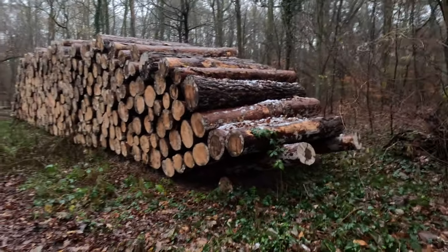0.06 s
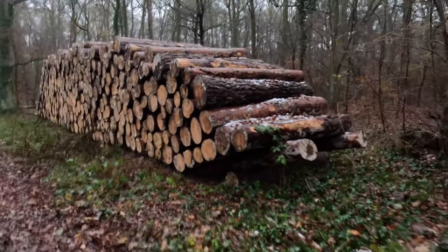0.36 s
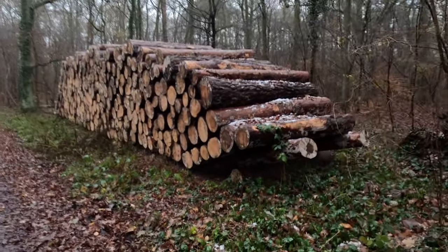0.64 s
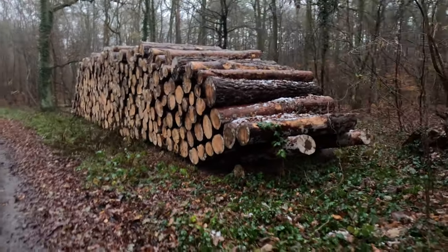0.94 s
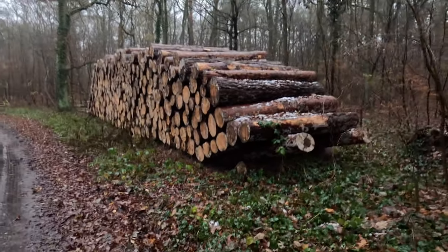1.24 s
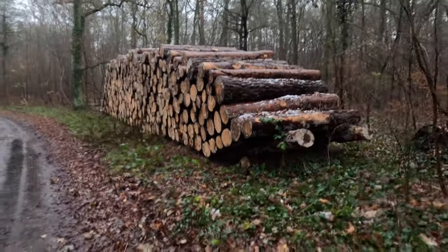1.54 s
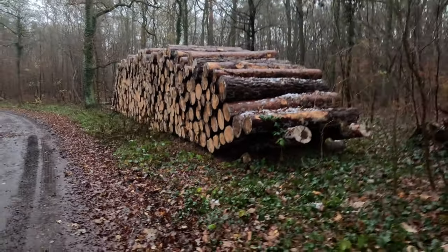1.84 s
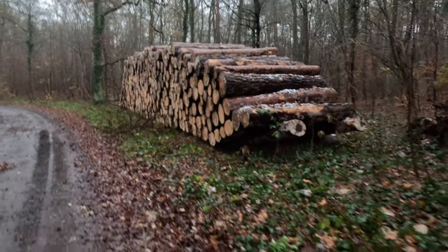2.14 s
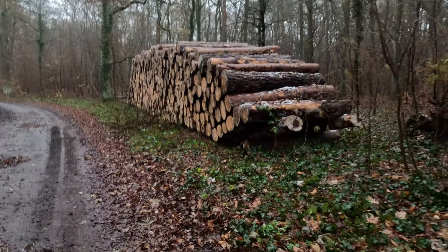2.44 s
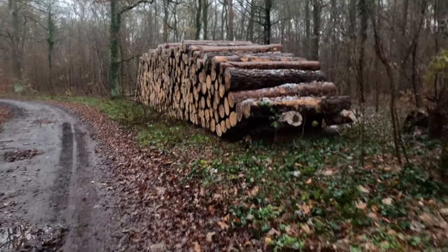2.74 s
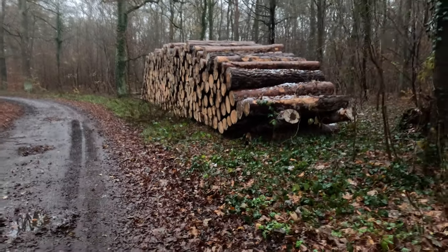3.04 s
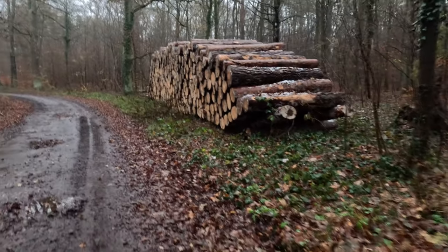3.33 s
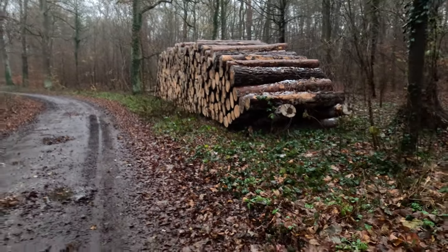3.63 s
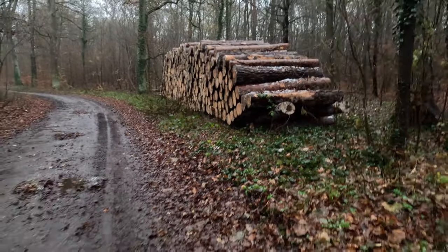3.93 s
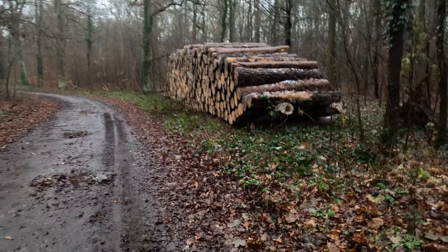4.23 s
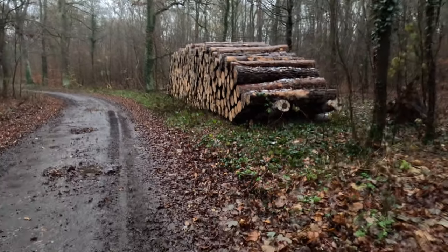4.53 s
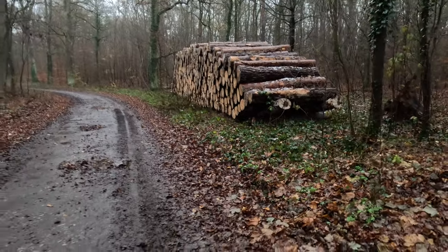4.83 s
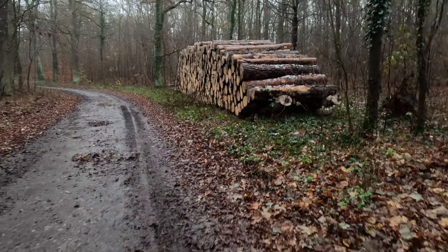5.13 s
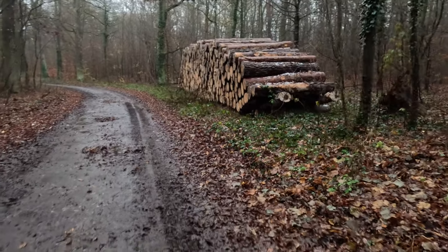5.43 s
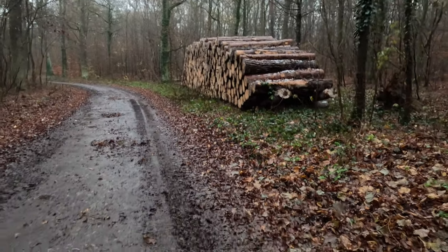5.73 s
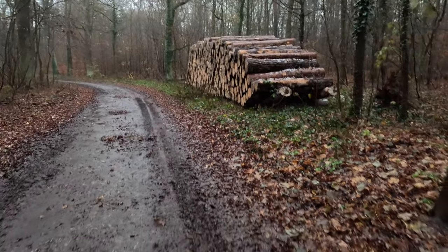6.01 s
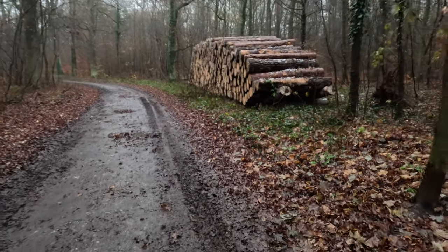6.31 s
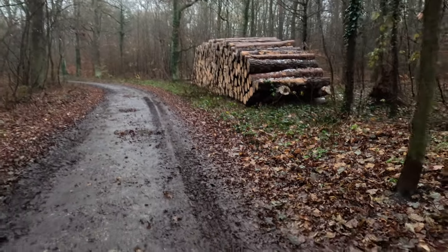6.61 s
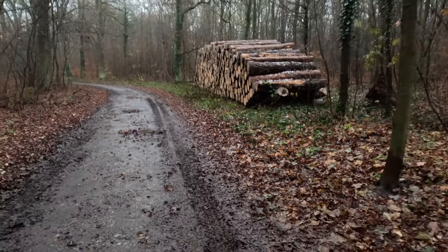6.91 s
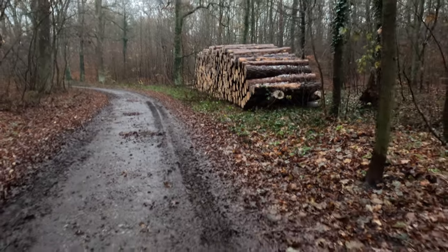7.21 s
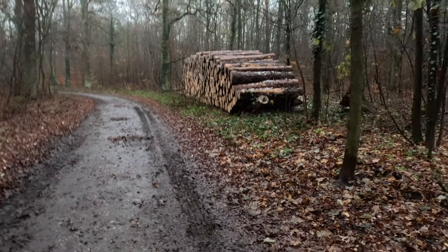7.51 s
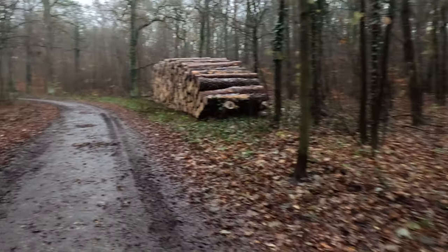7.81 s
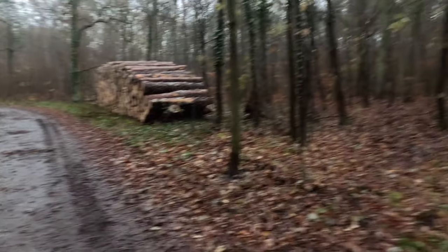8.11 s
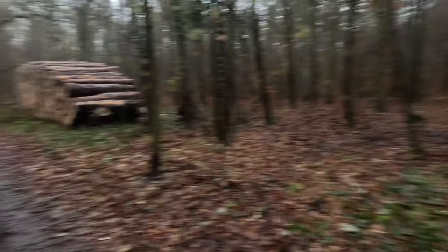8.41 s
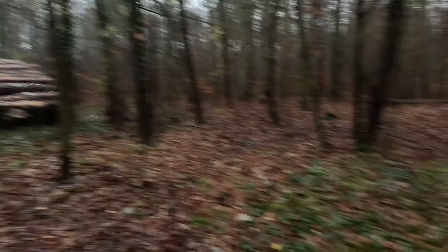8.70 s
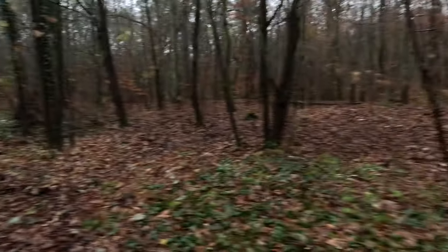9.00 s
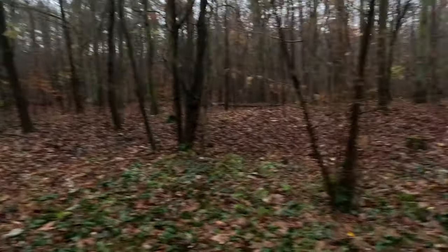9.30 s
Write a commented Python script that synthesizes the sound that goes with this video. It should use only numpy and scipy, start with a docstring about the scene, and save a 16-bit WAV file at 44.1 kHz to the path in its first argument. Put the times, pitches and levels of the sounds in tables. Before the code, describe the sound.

Slow footsteps on a muddy forest track are heard close to a hand-held microphone, over a soft woodland hush and a light, low breeze rumble. From about 0.3 seconds the steps come a little more than half a second apart. Heels sink in with dull thuds, mud squelches in small bubbly pops, and wet leaves crackle under the soles, while twigs and grit snap irregularly throughout. The heaviest thuds land at about 5.5 and 6.6 seconds. Small birds give faint, thin, high whistles far off, echoing among the trees, near the start, around 2 seconds, from 3 to 5, and again from 7 to just past 8. A brief gust bumps the microphone near 4.9 seconds. From about 8.5 seconds, stronger air rumbles and thumps on the microphone, leaning to the right, as the steps carry on until about 9.5 seconds.

```python
"""Slow footsteps thud and squelch along a muddy forest track, heard by a hand-held microphone.
Each heel sinks into soft ground, mud bubbles and wet leaves crackle under the sole, and small
twigs and grit snap. Little birds whistle far off over the hush of the wood. Moving air rumbles
on the microphone, most near the end as the walker turns."""
import sys
import numpy as np
from scipy import signal
from scipy.io import wavfile
from scipy.ndimage import uniform_filter1d

SR = 44100
rng = np.random.default_rng(int(sys.argv[2]) if len(sys.argv) > 2 else 0)


def to_wav(sig):
    """Store sig (one row per channel, or 1-D mono) as 16-bit WAV at the path in sys.argv[1].

    Samples outside -1..1 are clipped; the rate is SR.
    """
    pcm = np.clip(np.atleast_2d(sig), -1, 1) * 32767
    pcm = np.round(pcm).astype(np.int16)
    wavfile.write(sys.argv[1], SR, pcm.T)  # frames by channels


N = 421155
TIME = np.arange(N) / SR

# heels landing: start_s, level_db, pitch_hz, swell_s, slap_db (compared with the thud)
HEEL_STRIKES = [(0.3616, -33, 161, 0.0033, -13), (1.5150, -32.5, 155, 0.0023, -9),
                (2.644, -33.5, 167, 0.002, -19), (3.214, -46, 199, 0.0038, -17),
                (3.796, -42, 210, 0.0027, -11), (4.361, -39.5, 136, 0.0023, -13),
                (4.945, -35, 152, 0.0012, -24), (5.4917, -23, 224, 0.0025, -28),
                (5.681, -43, 232, 0.003, -17), (6.071, -34, 180, 0.0025, -7.5),
                (6.63, -19, 254, 0.0022, -10), (6.825, -42, 202, 0.003, -8),
                (7.2758, -29.5, 213, 0.0021, -17), (7.9410, -38.5, 210, 0.002, -8.5)]
# a sole presses down or peels off: start_s, loading_s, hold_s, release_s, mud_db, leaf_db
SOLE_PRESSES = [(0.344, 0.021, 0.056, 0.21, -48.5, -54), (0.897, 0.094, 0.015, 0.25, -47.5, -52),
                (1.312, 0.049, 0.022, 0.25, -51, -58), (1.503, 0.014, 0.05, 0.34, -49, -54),
                (1.63, 0.056, .03, 0.15, -65, -55), (2.028, 0.026, 0.065, .15, -48, -54),
                (2.197, 0.061, 0.054, 0.17, -51, -52.5), (2.626, 0.06, 0.052, 0.14, -46.5, -55),
                (2.753, 0.072, 0.092, 0.093, -53, -51.5), (3.233, 0.013, 0.015, .22, -45, -50),
                (3.78, 0.061, 0.043, 0.2, -50.5, -53.5), (4.326, 0.039, 0.15, .12, -55, -57),
                (4.932, 0.015, 0.066, 0.1, -57, -61.5), (5.034, .06, 0.016, 0.03, -52, -53.5),
                (5.469, 0.044, 0.11, 0.055, -53.5, -54.5), (6.04, 0.023, 0.12, 0.077, -53.5, -56),
                (6.305, 0.011, 0.011, 0.15, -50.5, -45.5), (6.785, 0.017, .02, 0.093, -56.5, -60),
                (7.262, 0.011, 0.016, 0.089, -56, -64), (7.33, 0.014, .02, .25, -57.5, -58.5),
                (7.928, 0.049, .02, 0.21, -51.5, -54.5), (8.069, 0.014, 0.0085, 0.076, -59.5, -62),
                (8.519, 0.039, 0.038, 0.2, -49, -51), (9.086, 0.029, 0.015, 0.11, -50, -50)]
# single leaves crushed flat: middle_s, half_width_s, level_db
LEAF_CRUSHES = [(0.426, .005, -44), (0.519, 0.011, -53.5), (2.048, .0045, -51), (2.116, 0.0079, -49),
                (3.219, 0.0064, -48), (3.267, .009, -52), (4.425, 0.0051, -46.5), (4.992, 0.0094, -47),
                (6.39, 0.0061, -43), (6.838, .008, -47), (7.352, 0.0064, -46.5), (8.099, 0.0054, -50),
                (9.098, .0054, -44), (9.125, 0.013, -43.5)]
# pockets of wet mud squeezed out: middle_s, length_s, pitch_hz, level_db
MUD_POCKETS = [(0.383, 0.017, 1540, -46), (0.425, 0.017, 1550, -46.5), (1.526, 0.0098, 1580, -37.5),
               (1.554, 0.028, 1880, -46), (1.912, 0.019, 2050, -47), (2.097, .011, 1600, -41.5),
               (2.24, 0.012, 1810, -40.5), (2.307, 0.026, 2050, -47), (3.215, .012, 1900, -46.5),
               (3.253, .022, 1500, -42.5), (3.306, .016, 1920, -40.5), (3.35, 0.013, 2080, -51),
               (3.839, 0.016, 1900, -46.5), (3.88, 0.011, 1950, -45), (4.537, 0.023, 1250, -50.5),
               (5.088, 0.026, 1570, -51.5), (6.081, .025, 1520, -45.5), (6.334, .024, 1710, -45.5),
               (6.376, 0.0086, 760, -48), (6.802, 0.01, 1930, -45), (8.645, .019, 1540, -45.5),
               (9.127, 0.025, 1680, -45)]
# twigs and grit snapping: start_s, knock_hz, knock_db, crack_hz, crack_db, left_over_right_db
TWIG_SNAPS = [(0.0315, 1840, -41, 2910, -56, 2), (0.4239, 1980, -49, 5430, -45, 7),
              (0.4471, 1320, -44.5, 3810, -58, 7), (1.5248, 1640, -45, 3140, -60, 2),
              (1.7561, 1180, -63, 4560, -49, 2), (1.815, 1720, -52, 3780, -50.5, 2),
              (2.0975, 1910, -42, 4500, -47, 0), (2.2218, 2190, -46, 3470, -46, -2),
              (2.2399, 1900, -47, 5250, -52, 5), (2.5322, 1970, -50.5, 7860, -64, 3),
              (3.1477, 1540, -51, 4410, -62, -4), (3.2767, 1660, -33.5, 3020, -42, 5),
              (3.5336, 1660, -56, 6900, -44, 3), (3.545, 1480, -36, 4000, -43, 2),
              (3.5925, 1620, -47.5, 4330, -65, 5), (3.6154, 1720, -53, 4630, -70, -1),
              (3.7849, 1910, -40, 3700, -35, 3.5), (3.8424, 2050, -44, 2970, -47, 4),
              (3.8794, 2100, -43.5, 2910, -46, -1), (4.1323, 1140, -59, 3000, -51, 7),
              (4.1728, 1170, -45.5, 3510, -63, 3), (4.1918, 1570, -54, 5200, -47, 4),
              (4.6718, 1980, -51, 3480, -53, 5), (4.9505, 1260, -44, 5670, -52, 7),
              (5.2248, 1740, -49, 4660, -43.5, 3), (5.4002, 1870, -50, 2990, -60, 2),
              (5.4325, 1900, -50.5, 4130, -50.5, 2), (5.6014, 2170, -46, 3600, -45, -3),
              (5.6845, 1750, -50.5, 4500, -48.5, 3), (5.929, 2000, -49.5, 3550, -60, 4),
              (5.9744, 1910, -47.5, 2910, -60, 3), (6.0618, 1920, -40.5, 3470, -49, -2),
              (6.1701, 2500, -62, 4550, -36.5, 1), (6.3206, 2580, -45, 5490, -50, 4),
              (6.3743, 1530, -50, 4650, -41, 2), (6.6027, 1510, -53, 3210, -53, 5),
              (6.644, 1950, -47, 3000, -50.5, 4), (6.7037, 1670, -42.5, 4130, -62, 3),
              (6.8073, 2020, -43.5, 3620, -49, 0), (6.8692, 2240, -64, 4770, -52, 1),
              (6.942, 1390, -46, 3060, -70, 2), (6.962, 1760, -53, 5100, -54, 7),
              (7.0595, 1810, -53.5, 5070, -49.5, 5), (7.1158, 1220, -58.5, 3800, -53, 3),
              (7.5033, 2520, -61, 3120, -37.5, -4), (7.6514, 1470, -48.5, 3080, -51.5, 3),
              (7.8156, 1960, -63, 7000, -44, 3), (7.991, 1800, -35.5, 3700, -44.5, 4),
              (8.0873, 1640, -46, 4240, -46, 2), (8.64, 1520, -42, 3340, -49, 6),
              (8.7104, 1940, -47.5, 3340, -54, 7), (8.837, 2100, -48, 3440, -51.5, 4),
              (8.9607, 2010, -42, 3160, -50, 8), (9.0213, 1980, -65, 7160, -49, 3),
              (9.1147, 1830, -49, 4180, -60, 2), (9.4442, 2170, -51.5, 3500, -51.5, 5),
              (9.4985, 1600, -49, 3140, -56, 7)]
# a typical faint snap and how much it varies: the same columns without start_s
STRAY_SNAP, STRAY_SPREAD = (1700, -60.5, 4200, -58.5, 0), (300, 2.5, 700, 3.5, 4)
# bird whistles: start_s, length_s, start_hz, end_hz, level_db
BIRD_WHISTLES = [(0.053, 0.11, 4350, 4450, -66), (0.242, 0.056, 4380, 4450, -69),
                 (0.633, 0.052, 7950, 7340, -61), (1.883, 0.03, 5450, 5160, -57),
                 (1.897, 0.12, 5040, 5010, -61), (2.97, 0.084, 4520, 4560, -63.5),
                 (3.128, .07, 4450, 4600, -64), (3.009, 0.041, 6700, 6410, -64),
                 (3.66, 0.085, 7900, 7960, -67), (3.984, 0.13, 5040, 4970, -59),
                 (4.274, 0.11, 3810, 4760, -60), (4.73, 0.072, 4250, 4250, -66),
                 (6.932, 0.051, 7750, 7300, -69), (6.998, 0.038, 7750, 7230, -68),
                 (7.06, .05, 7700, 7300, -73), (7.861, 0.055, 4400, 4460, -55),
                 (8.034, 0.23, 4380, 4280, -64), (8.212, 0.019, 7600, 7850, -56),
                 (8.29, 0.045, 7760, 6300, -64)]
# how loud the hush of the wood is: time_s, level_db
HUSH_LEVELS = [(0.0, -55.5), (2.28, -55.5), (2.39, -56), (5.42, -58), (6.65, -57), (7.05, -57.5),
               (7.79, -56), (9.55, -57.5)]
# a light breeze on the microphone: time_s, level_db
BREEZE_LEVELS = [(0, -46), (3.2, -47), (4.2, -48.5), (5.0, -46), (5.8, -46), (6.3, -50.5), (7.7, -49),
                 (9.55, -46)]
# gusts and swings of the hand: middle_s, half_width_s, level_db
AIR_GUSTS = [(4.884, 0.11, -40.5), (8.193, 0.05, -44), (8.62, .09, -31), (8.777, 0.02, -34),
             (8.872, 0.057, -35.5), (9.04, 0.072, -34.5), (9.109, 0.019, -25.5), (9.335, 0.028, -39.5),
             (9.535, 0.017, -32)]
# single bumps of air: middle_s, peak_db, half_width_s
AIR_BUMPS = [(4.858, -30, 0.0028), (8.576, -31, 0.0011), (8.618, -24, 0.0022), (8.763, -21, 0.0026),
             (8.85, -18.5, 0.0017), (9.102, -19, 0.0016), (9.337, -24, 0.0036)]

# the tone of each noise, from low to high: frequency_hz, relative_db
MUD_TONE = [(200, -2), (400, -4.5), (780, -6.5), (1100, -0.5), (1800, 0.5), (2400, 2.5), (3000, -5),
            (4000, -15)]
LEAF_TONE = [(2000, -10), (2900, -4), (4000, 2.5), (5500, 2), (7600, -1.5), (8800, -9.5), (11000, -18.5),
             (13000, -54), (15000, -44)]
HUSH_TONE = [(130, 6), (300, 5), (500, 0), (800, -7.5), (1150, 2), (1800, 1), (2700, -5), (4500, -7),
             (6200, -10), (7700, -13), (8800, -20.5), (11000, -26.5), (12800, -32)]
RUMBLE_TONE = [(8.8, -50), (15, 5), (43, 3), (62, -2.5), (102, -14.5), (140, -16), (180, -69), (310, -120)]
# how alike left and right are: frequency_hz, likeness (1 or more means fully alike)
FOOT_LIKENESS = [(200, 0.5), (1300, 2.5), (2400, 0.5), (4500, 0.9), (8000, 0.6), (12000, 0.7)]
BACKGROUND_LIKENESS = [(60, 0.94), (300, 0.78), (1400, 0.61), (3000, 0.6), (6500, 0.84), (14000, 0.23)]
# which side the noises lean to: frequency_hz, left_over_right_db
SIDE_BALANCE = [(60, 0), (350, -1.5), (700, 2.5), (1200, 2.5), (1700, 7), (2400, 0), (4200, 1), (7700, 2),
                (13000, 10.5)]
# the microphone's left and right openings (ports) ring a little differently: pitch_hz, sharpness_q
MIC_PORTS = [(2300, 2.6), (2620, 2.6)]


def heels(trim_db=0.5, bend=0.97, bend_s=0.00069, ground_hz=140, ground_s=0.0059):
    """A heel slaps wet ground and thuds, its pitch sinking as the ground yields; loose soil settles."""
    out, t = np.zeros(N), np.arange(SR // 5) / SR
    soil_fade_s, slap_fade_s = 0.36, 0.04  # time to fade by 60 dB
    sinking = 1 - np.exp(-t / bend_s)
    ground = from_db(-17) * np.cos(2 * np.pi * ground_hz * t) * t / ground_s * np.exp(1 - t / ground_s)
    for start_s, db, hz, swell_s, slap_db in HEEL_STRIKES:
        cycles = hz * (t + bend * bend_s * sinking)
        thud = np.sin(2 * np.pi * cycles) * t / swell_s * np.exp(1 - t / swell_s)
        soil = band_noise(len(t), 83, 520) * from_db(-26 - 60 * t / soil_fade_s)
        slap = band_noise(len(t), 240, 710) * from_db(slap_db - 60 * t / slap_fade_s) * sinking
        add(out, start_s, from_db(db + trim_db) * (thud + ground + soil + slap))
    return out


def soles(uneven_db=4.5):
    """Under the rolling sole, mud pops and leaves crackle higher up; the ground gives way unevenly."""
    mud_gain, leaf_gain, crushed = np.zeros((3, N))
    for start_s, loading_s, hold_s, release_s, mud_db, leaf_db in SOLE_PRESSES:
        press = foot_weight(loading_s, hold_s, release_s)
        add(mud_gain, start_s, from_db(mud_db) * press)
        add(leaf_gain, start_s, from_db(leaf_db) * press)
    for middle_s, half_s, db in LEAF_CRUSHES:
        add(crushed, middle_s - 2 * half_s, from_db(db) * np.hanning(int(4 * half_s * SR)))
    giving = from_db(uneven_db * np.tanh(drift(20)))
    shared = crackle(per_s=600, spread_db=5.0, burst_s=0.00047, hiss_db=-2, clump_db=1.5)
    pops = crackle(per_s=420, spread_db=-1.0, burst_s=0.00071, hiss_db=-10, clump_db=-1.5)
    ticks = crackle(per_s=1100, spread_db=1.5, burst_s=0.00025, hiss_db=3.5, clump_db=-0.5)
    mud = shaped_noise(MUD_TONE, FOOT_LIKENESS, np.hypot(shared, pops), flutter_db=2.0)
    leaves = shaped_noise(LEAF_TONE, FOOT_LIKENESS, np.hypot(shared, ticks), flutter_db=3.0)
    return giving * mud_gain * mud + np.hypot(giving * leaf_gain, crushed) * leaves


def foot_weight(loading_s, hold_s, release_s, touch_db=-12, release_db=-24.5):
    """Loudness of one press: the sole touches, takes the weight, holds it and lets go."""
    t = TIME[:SR]
    loading = touch_db * np.maximum(1 - t / loading_s, 0)
    release = release_db * np.maximum(t - loading_s - hold_s, 0) / release_s
    return from_db(loading + release)


def squelches(trim_db=-1.0, bubbles_per_s=1300, spread_octaves=0.19, ring_cycles=18.5):
    """Each mud pocket bursts as a quick run of tiny bubbles that ring near the pitch of its hollow."""
    out, t = np.zeros(N), np.arange(SR // 12) / SR
    for middle_s, length_s, hz, db in MUD_POCKETS:
        count = int(np.clip(bubbles_per_s * length_s, 3, 80))
        when, detune, size = rng.standard_normal((80, 3))[:count].T[..., None]
        age_s = np.maximum(t - length_s * (1 + 0.45 * np.clip(when, -2, 2)), 0)
        cycles = age_s * hz * 2 ** (spread_octaves * detune)
        bubbles = size * np.sin(2 * np.pi * cycles) * from_db(-60 * cycles / ring_cycles)
        burst = bubbles.sum(axis=0)
        strength = np.sqrt(np.sum(burst ** 2) / (length_s * SR))
        add(out, middle_s - length_s, burst / strength * from_db(db + trim_db))
    return panned(out, left_over_right_db=5.5)


def snaps(crack_trim_db=-0.5, splinter_s=0.011, scatter_s=0.49, stereo_width=0.2):
    """A clean break, splinters and a faint scatter off the ground ring as a low knock and high crack."""
    out, t = np.zeros((2, N)), np.arange(SR // 10) / SR
    clean_break = from_db(15) * (t == 0)
    fade = from_db(-60 * t / splinter_s) + from_db(-29 - 60 * t / scatter_s)
    for start_s, knock_hz, knock_db, crack_hz, crack_db, pan_db in [*TWIG_SNAPS, *stray_snaps(14)]:
        for hz, db, width in ((knock_hz, knock_db, 0.24), (crack_hz, crack_db + crack_trim_db, 0.3)):
            centre, side = rng.standard_normal((2, len(t))) * fade
            burst = centre + stereo_width * side * [[1], [-1]] + clean_break
            ring = band(burst, hz / (1 + width), hz * (1 + width))
            snap = band(ring + from_db(-17) * burst, hz * 0.29, 6750)
            strength = np.sqrt(np.mean(snap[:, :SR // 200] ** 2))  # over the first 5 ms
            add(out, start_s, panned(snap / strength * from_db(db), pan_db))
    return out


def stray_snaps(count):
    """Rows for faint snaps in the trodden leaves and twigs, at random times, each a little different."""
    start_s = rng.uniform(0, TIME[-1], count)
    variation = np.clip(rng.standard_normal((count, len(STRAY_SNAP))), -2, 2) * STRAY_SPREAD
    return np.column_stack([start_s, STRAY_SNAP + variation])


def birds(trim_db=1.0, waver=0.012, flutter_db=6.0, echo_s=1.2, direct_db=-5):
    """Thin fluttering whistles from far off, mostly heard as echoes among the trunks."""
    song, wander = np.zeros(N), drift(115)
    for start_s, length_s, start_hz, end_hz, db in BIRD_WHISTLES:
        progress = np.linspace(0, 1, int(length_s * SR))
        glide_hz = start_hz + (end_hz - start_hz) * progress
        hz = glide_hz * (1 + waver * wander[int(start_s * SR):][:len(progress)])
        swell = np.sqrt(np.abs(np.sin(np.pi * progress)))
        add(song, start_s, from_db(db + trim_db) * swell * np.sin(2 * np.pi * np.cumsum(hz) / SR))
    song *= from_db(flutter_db * np.tanh(drift(32)))
    trunks = rng.standard_normal((2, SR)) * from_db(-60 * TIME[:SR] / echo_s)
    echoes = signal.fftconvolve(song[None], unit_level(trunks) / np.sqrt(SR), axes=1)[:, :N]
    return from_db(direct_db) * song + echoes


def hush(trim_db=-0.22):
    """The steady hush of the damp wood, with a few faint ticks from the fallen leaves."""
    gain = from_db(np.interp(TIME, *np.transpose(HUSH_LEVELS)) + trim_db)
    ticks = crackle(per_s=81, spread_db=0.0, burst_s=0.00028, hiss_db=8.0, clump_db=3.5)
    return gain * shaped_noise(HUSH_TONE, BACKGROUND_LIKENESS, ticks, flutter_db=1.0)


def air(trim_db=1.5, turn_s=(8.3, 8.55), turn_pan_db=-5.5, swirl_db=-8, top_hz=150):
    """Air rumbles and bumps on the ports; from the turn on, it swirls and hits the right one harder."""
    flow = from_db(trim_db) * airflow()
    rumble = shaped_noise(RUMBLE_TONE, BACKGROUND_LIKENESS)
    # even out the rumble so that the flow sets its loudness
    rumble /= np.sqrt(uniform_filter1d(np.mean(rumble ** 2, axis=0), size=SR // 14))
    pressure = signal.sosfilt(signal.butter(4, top_hz, fs=SR, output="sos"), flow * rumble)
    turn = np.interp(TIME, turn_s, [0, 1])
    # swirls grow with the square of the flow, so they come with the strongest gusts
    swirls = from_db(swirl_db) * turn * flow ** 2 / flow.max() * band_noise(N, 58, 187, order=3)
    bumps = np.zeros(N)
    for middle_s, db, half_s in AIR_BUMPS:
        offset = (TIME - middle_s) / half_s
        bumps += from_db(db) * (1 - offset ** 2 / 2) * np.exp(-offset ** 2 / 2)
    return panned(pressure + swirls + bumps, turn * turn_pan_db)


def airflow(wander_db=1.3):
    """Strength of the air on the ports: a wandering breeze, and gusts that swell and fade."""
    power = from_db(np.interp(TIME, *np.transpose(BREEZE_LEVELS)) + wander_db * drift(6)) ** 2
    for middle_s, half_s, db in AIR_GUSTS:
        power += from_db(db) ** 2 * np.exp(-((TIME - middle_s) / half_s) ** 2)
    return np.sqrt(power)


def crackle(per_s, spread_db, burst_s, hiss_db, clump_db):
    """A loudness curve of tiny, uneven bursts that come in clumps over a smooth hiss."""
    sizes = from_db(spread_db * np.minimum(rng.exponential(1, N), 4))
    starts = rng.random(N) < per_s / SR
    power = signal.lfilter([1], [1, -np.exp(-1 / (burst_s * SR))], starts * sizes ** 2 + 1e-18)
    clumps = from_db(clump_db * np.tanh(drift(44)))
    return np.sqrt(power / power.mean() + from_db(hiss_db) ** 2) * clumps


def shaped_noise(tone, likeness, loudness=1.0, flutter_db=0.0):
    """Stereo noise in bands about a third of an octave wide, each with its own level and flutter."""
    lowest, highest = tone[0][0], tone[-1][0]
    edges = np.geomspace(lowest, highest, int(np.log2(highest / lowest) * 3) + 2)
    noises, out = loudness * rng.standard_normal((2, 2, N)), 0
    for k, (low, high) in enumerate(zip(edges, edges[1:])):
        centre, side = band(noises[k % 2], low, high)  # the bands take turns between two noises
        hz = np.sqrt(low * high)
        alike = np.clip(at_hz(likeness, hz), 0, 1)
        pair = np.sqrt(1 + alike) * centre + np.sqrt(1 - alike) * side * [[1], [-1]]
        gain = from_db(at_hz(tone, hz) + flutter_db * drift(57))
        out = out + gain * panned(pair, at_hz(SIDE_BALANCE, hz))
    return out / np.sqrt(np.mean(out.mean(axis=0) ** 2))


def drift(rate_hz):
    """A smooth random wander of typical size 1, worked out at every 40th sample."""
    memory = np.exp(-80 * np.pi * rate_hz / SR)
    noise = rng.standard_normal(N // 40 + 2002)
    slow = signal.lfilter([1], [1, -2 * memory, memory ** 2], noise)[2000:]
    return np.interp(np.arange(N) / 40, np.arange(len(slow)), unit_level(slow))


def band(x, low_hz, high_hz, order=2):
    """Keep the part of a sound between two frequencies."""
    sections = signal.butter(order, [low_hz, min(high_hz, 0.45 * SR)], "band", fs=SR, output="sos")
    return signal.sosfilt(sections, x + 1e-18)


def band_noise(samples, low_hz, high_hz, order=2):
    """Noise between two frequencies, at an average level of 1."""
    return unit_level(band(rng.standard_normal(samples), low_hz, high_hz, order))


def from_db(db):
    """Turn decibels into a number to multiply by."""
    return 10 ** (np.asarray(db) / 20)


def unit_level(x):
    """Scale to an average (rms) level of 1."""
    return x / np.sqrt(np.mean(x ** 2) + 1e-20)


def at_hz(table, hz):
    """Read between the rows of a frequency table, with octaves evenly spaced."""
    frequencies, values = np.transpose(table)
    return np.interp(np.log(hz), np.log(frequencies), values)


def panned(x, left_over_right_db):
    """Place a sound by making one side louder than the other."""
    return x * from_db(np.array([left_over_right_db, -left_over_right_db]).reshape(2, -1) / 2)


def add(out, start_s, sound):
    """Mix a sound in at its start time."""
    start = max(int(start_s * SR), 0)
    out[..., start:start + sound.shape[-1]] += sound[..., :N - start]


def scene():
    """Feet close by, the wood around, air on the microphone."""
    return soles() + squelches() + heels() + snaps() + birds() + hush() + air()


def record(dry):
    """Each port delays the sound near its own pitch, and the recorder cuts the highest treble."""
    heard, cutoff_hz = [], 14700
    for channel, (hz, sharpness) in zip(dry, MIC_PORTS):
        ring = signal.lfilter(*signal.iirpeak(hz, sharpness, fs=SR), channel)
        heard.append(channel - 2 * ring)
    return signal.sosfilt(signal.ellip(10, 0.1, 80, cutoff_hz, fs=SR, output="sos"), heard)


dry = scene()
out = record(dry)
to_wav(out)
```